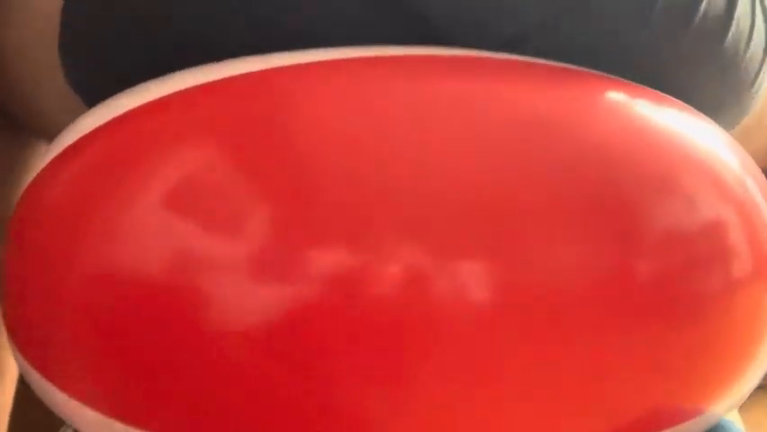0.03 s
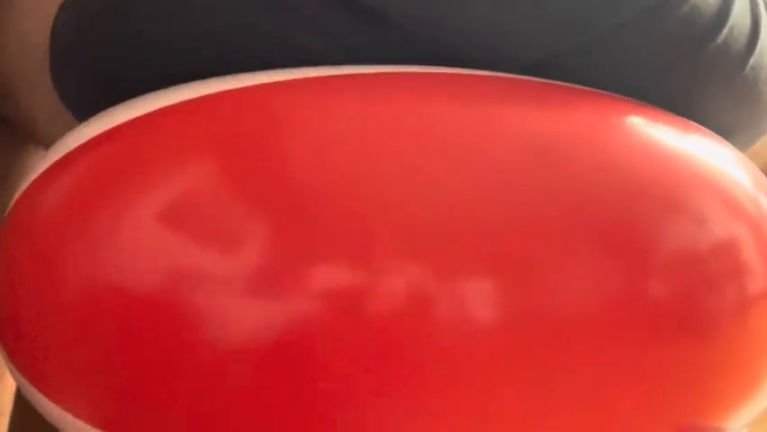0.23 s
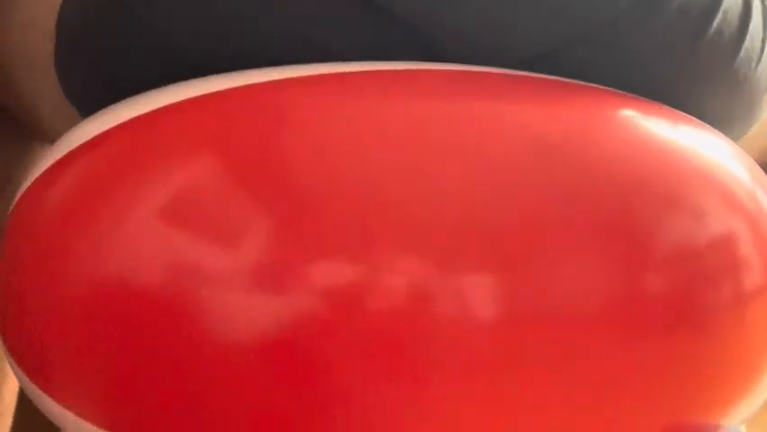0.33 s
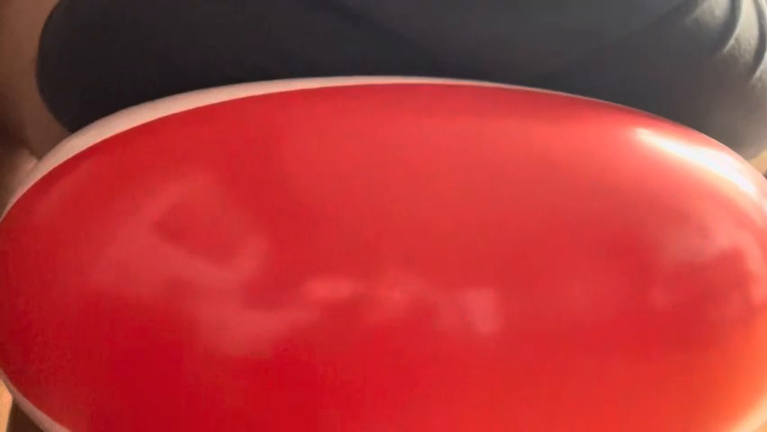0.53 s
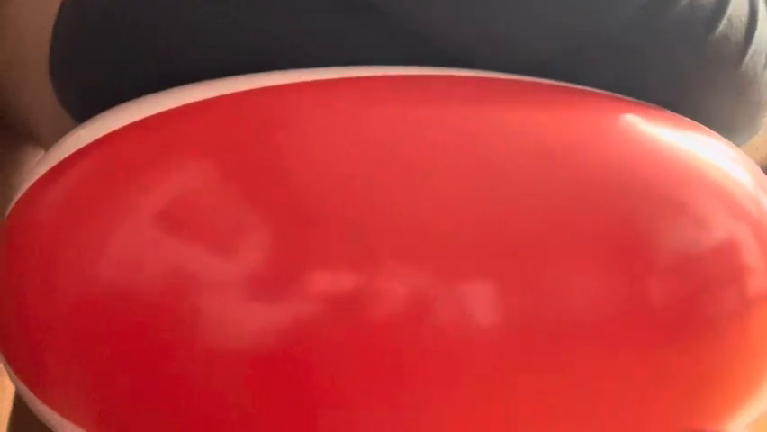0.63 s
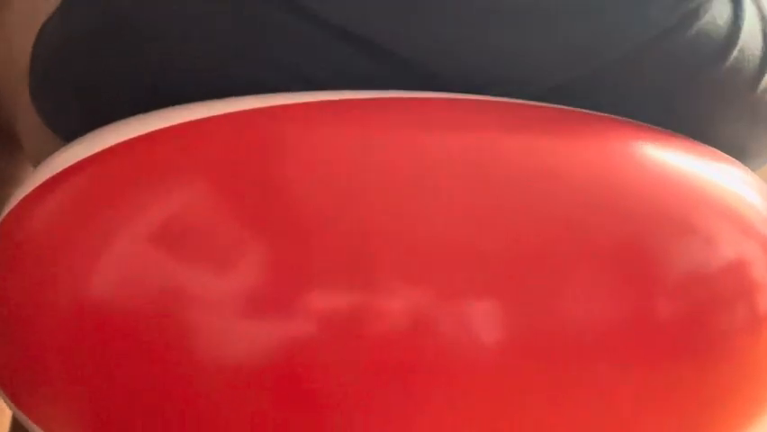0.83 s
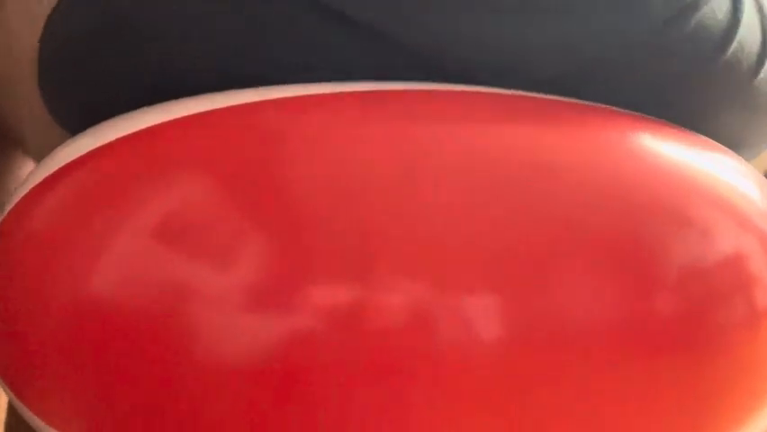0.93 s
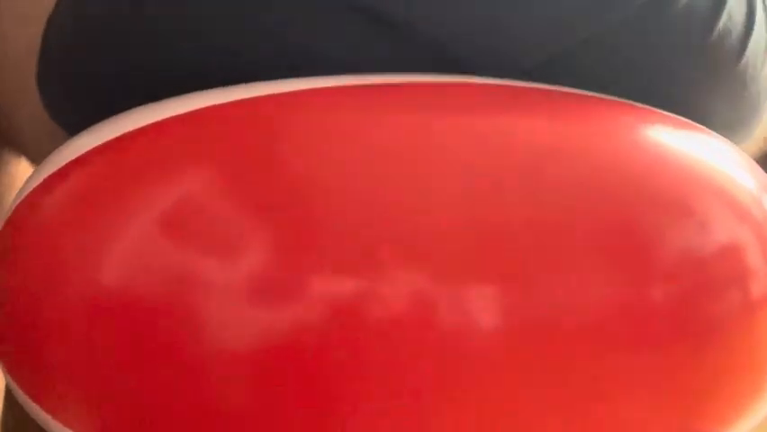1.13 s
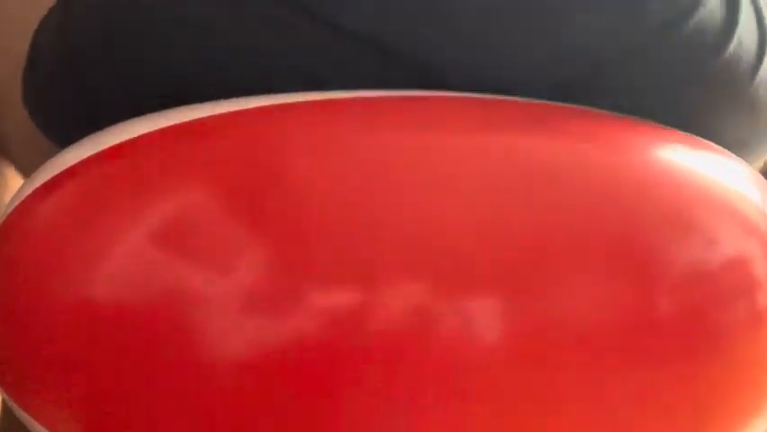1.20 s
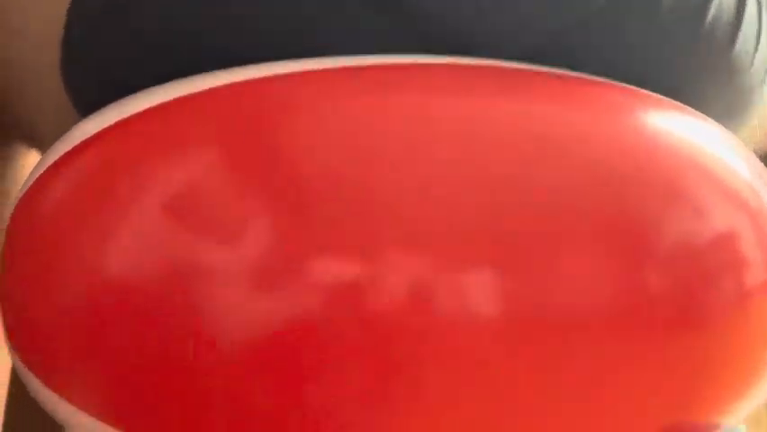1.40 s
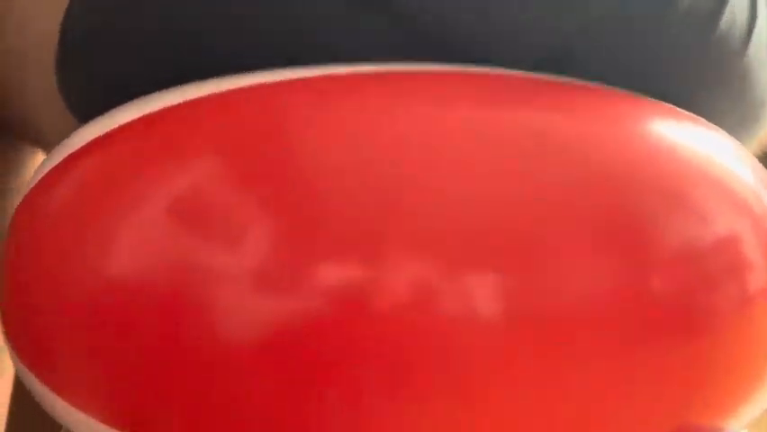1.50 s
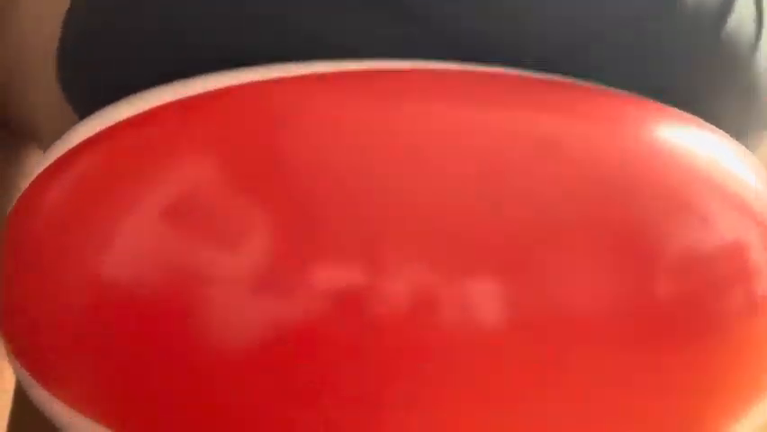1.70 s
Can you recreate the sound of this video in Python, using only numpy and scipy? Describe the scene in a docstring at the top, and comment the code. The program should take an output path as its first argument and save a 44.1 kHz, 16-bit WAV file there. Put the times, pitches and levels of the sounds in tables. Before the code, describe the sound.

A big inflated vinyl ball gives a short stuttering, rubbery creak as someone shifts against it.

```python
"""A faint rustle, two snaps, then a stuttering run of them: a person shifts against a big inflated
vinyl ball, close to a stereo microphone in a small room. The skin sticks and slips. Each slip is a
crack and a falling thump of the skin; the air in the ball rings on. Small ticks, soft rustles of
cloth and low bumps follow as the weight settles, over a low rumble and a faint hiss."""
import sys
import numpy as np
from scipy import signal
from scipy.fft import rfft, irfft, next_fast_len
from scipy.io import wavfile
from scipy.ndimage import map_coordinates

SR = 44100
rng = np.random.default_rng(int(sys.argv[2]) if len(sys.argv) > 2 else 0)


def unload_audio(sound):
    """Save the sound as a 16-bit wav file, at the path given as the first command line argument."""
    columns = np.transpose(np.atleast_2d(sound))
    # keep every value between -1 and 1, then stretch to whole-number steps
    steps = np.round(np.clip(columns, -1, 1) * 32767)
    wavfile.write(sys.argv[1], SR, steps.astype(np.int16))


N = 77175

# How long the air in the ball rings: freq_hz, t60_s
BALL_DECAY = [(500, 0.45), (2400, 0.46), (4000, 0.35), (8000, 0.15), (14000, 0.27)]


def slips():
    """The vinyl sticks and lets go: each slip or tick is a thump and a crack with a rough tail."""
    # Slips of the skin: start_s, thump_db, crack_db, start_pitch_hz
    snaps = [(0.1786, -20.5, -48.5, 822), (0.2086, -15, -36.5, 855), (.4213, -6, -21.5, 742),
             (.4449, -16.5, -44, 773), (.4504, -10, -25.5, 846), (0.4555, -8, -25.5, 859),
             (.4626, -7, -22, 883), (0.4727, -9.5, -21, 910), (0.4848, -9.5, -22, 879),
             (0.5039, -8.5, -21, 851), (.5222, -6, -18, 909), (0.534, -8.5, -19, 884),
             (.543, -8.5, -23, 904), (.5495, -11, -20, 918), (.5546, -10.5, -24.5, 912),
             (.5589, -20.5, -24.5, 970), (.5628, -22, -29, 968), (0.5669, -23, -30, 950),
             (.571, -20.5, -35.5, 860)]
    # Small ticks of the vinyl: start_s, thump_db, crack_db, start_pitch_hz
    ticks = [(.4055, -38, -44, 794), (.7035, -32.5, -33, 930), (.709, -28, -41, 744), (.742, -32, -39, 960),
             (.776, -39, -41.5, 700), (.961, -48, -64, 650), (.979, -35.5, -59, 720),
             (.987, -42, -45.5, 722), (.999, -43.5, -47.5, 904), (1.227, -39.5, -64.5, 714),
             (1.59, -42, -52, 1473)]
    # How well the skin radiates the thump: freq_hz, gain_db
    skin_radiation = [(80, -2), (150, -1), (250, 1.5), (350, 0.5), (500, -3.5), (760, 2.5), (1000, -1.5),
                      (1300, -0.5), (2000, 4)]
    # Bright snap of the vinyl, with a dip at 8.5-11 kHz in the same response: freq_hz, gain_db
    snap_and_notch = [(100, -53), (400, -29.5), (900, 0.5), (1700, 5), (2600, -4.5), (3600, 1.5),
                      (5000, -6.5), (7000, -12), (8500, -35.5), (11000, -34.5), (13500, -24.5),
                      (16000, -34)]
    thump_lag_s, tail_s = 0.00028, 0.0023  # the flexing wave arrives just after the crack
    thumps, cracks = np.zeros(N), np.zeros(N)
    for start_s, thump_db, crack_db, pitch_hz in snaps + ticks:
        t = since(start_s)
        thumps += amp(thump_db - 1) * thump(start_s + thump_lag_s, pitch_hz)
        tail = (t > 0) * np.exp(-t / tail_s) * rng.standard_normal(N)
        cracks += amp(crack_db - 3.5) * np.sqrt(2 / (tail_s * SR)) * tail
        cracks[round(start_s * SR)] -= amp(crack_db)
    upward_sweep = lambda hz: np.exp(2j * np.pi * 1.4 * np.log(hz + 810))  # lows lead the highs
    cracks = amp(17) * filtered(cracks, lambda hz: causal(snap_and_notch)(hz) * upward_sweep(hz))
    return filtered(thumps, causal(skin_radiation)), cracks


def thump(start_s, pitch_hz):
    """A flexing wave in the skin swells while its pitch falls; the whole ball gives after it."""
    t = since(start_s)
    glide_s, end_ratio, body_hz = 0.004, 0.3, 207.6
    cycles = pitch_hz * (end_ratio * t + (1 - end_ratio) * glide_s * (1 - np.exp(-t / glide_s)))
    swell = lambda peak_s, sharpness: (t / peak_s * np.exp(1 - t / peak_s)) ** sharpness
    after_swing = amp(-18.5) * swell(0.0066, 2.95)
    skin = (swell(0.002, 2) + after_swing) * np.sin(2 * np.pi * cycles)
    body = amp(-24.5) * swell(0.0035, 1.38) * np.sin(2 * np.pi * body_hz * t)
    return skin + body


def air_modes(drive):
    """The air in the ball rings at its own pitches after each slip."""
    # Resonances of the enclosed air: pitch_hz, level_db
    modes = [(241, -3), (378, -2), (409, -2), (437, -1), (487, -5), (597, 0), (727, 1), (767, 1), (893, -1),
             (991, 0), (1392, 1), (1719, -2), (2154, -1), (2450, -2)]
    t, t60_s = since(0), 0.55
    ring = sum(amp(db) * np.sin(2 * np.pi * hz * t) for hz, db in modes)
    return signal.fftconvolve(drive, ring * amp(-58 - 60 * t / t60_s))[:N]


def ball():
    """Slips reach the microphone directly, after trips across the ball, and in its ring and the room."""
    # Trips across the ball: delay_s, crack_db, thump_db
    echoes = [(.0039, -6.5, -19.5), (.0078, -14, -9.5)]
    # Shading of the thumps and air modes in the left channel: freq_hz, gain_db
    left_shade = [(100, -3), (220, -2), (380, -6.5), (550, -19.5), (750, -1), (1100, -1), (2400, 3.5)]
    # Dense upper air modes: freq_hz, gain_db
    upper_modes = [(150, -54), (600, -20), (1300, -6), (1800, -3), (2400, 5), (3000, -5), (3600, -14),
                   (7000, -4), (10000, 12), (16000, -14)]
    thumps, cracks = slips()
    low = thumps + sum(amp(db) * delayed(thumps, delay_s) for delay_s, _, db in echoes)
    low += air_modes(cracks + amp(-13) * thumps)
    high = cracks + sum(amp(db) * delayed(cracks, delay_s) for delay_s, db, _ in echoes)
    low_left = filtered(low, causal(left_shade))
    ring = amp(6.5) * reverberate(cracks, upper_modes, BALL_DECAY, build_s=0.0043)
    return np.array([low_left, low]) + high + ring + room(thumps)


def room(thumps):
    """The small room answers the thumps, a little weaker on the left."""
    # Colour of the reverberation: freq_hz, gain_db
    colour = [(100, -24.5), (240, 5), (400, -2), (700, -2.5), (1200, 11.5), (3000, 23)]
    # Reverberation time: freq_hz, t60_s
    decay = [(150, 0.35), (500, 0.47), (2000, 0.36)]
    return amp([[-10.5], [-7]]) * reverberate(thumps, colour, decay, build_s=0.012)


def rustles():
    """Cloth drags over the vinyl in short grainy strokes, and the ball rings faintly."""
    # Strokes of cloth: peak_s, level_db, rise_s, fall_s
    strokes = [(.005, -48, 0.055, 0.053), (0.126, -51.5, 0.089, 0.06), (.27, -54, 0.033, 0.022),
               (0.781, -46.5, 0.15, 0.051), (0.866, -55.5, 0.015, 0.017), (0.994, -47, 0.025, 0.04),
               (1.121, -60.5, 0.059, 0.026), (1.234, -49.5, 0.025, 0.0148), (1.259, -55.5, 0.015, 0.02),
               (1.389, -58, 0.049, 0.064), (1.595, -51, 0.027, 0.016), (1.615, -49.5, 0.047, .03),
               (1.74, -55, 0.044, 0.029)]
    # Colour of the cloth: freq_hz, gain_db
    colour = [(100, -38.5), (200, -1), (320, -9.5), (500, -3.5), (900, -10), (1800, -16), (2400, -20),
              (3000, -26.5), (6600, -30.5), (8500, -34), (11000, -38), (16000, -43.5)]
    # What the cloth sets ringing in the ball: freq_hz, gain_db
    ring_colour = [(200, -12), (1500, -9.5), (2500, 3), (3200, -37), (9000, -17)]
    t = since(0)
    power = sum(amp(db) ** 2 * np.exp(-2 * np.maximum((peak_s - t) / rise_s, (t - peak_s) / fall_s))
                for peak_s, db, rise_s, fall_s in strokes)
    grains = noise(colour) * amp(3 * wobble(knots_per_s=410))
    cloth = np.sqrt(power) * unit(grains)
    ring = reverberate(cloth[1], ring_colour, BALL_DECAY, build_s=0.01)
    return cloth * amp([[-1], [1]]) + ring


def bumps():
    """The ball gives softly under the shifting weight."""
    # Soft bumps of the ball: start_s, level_db, pitch_hz, t60_s
    nudges = [(0.104, -42.5, 135, 0.22), (0.128, -37, 67.6, .1), (0.779, -30, 234, 0.037),
              (0.849, -41.5, 160, 0.15), (1.005, -36.5, 62.6, 0.14), (1.225, -32, 154, 0.055),
              (1.24, -44.5, 55, 0.075), (1.583, -40, 175, 0.15), (1.625, -31, 148, 0.046)]
    rise_s = 0.0059
    sound = np.zeros(N)
    for start_s, level_db, pitch_hz, t60_s in nudges:
        t = since(start_s)
        envelope = amp(level_db - 60 * t / t60_s) * (1 - np.exp(-t / rise_s))
        sound += envelope * np.sin(2 * np.pi * pitch_hz * t)
    return sound


def background():
    """A low rumble that swells and sinks, and a faint hiss."""
    # Course of the rumble: time_s, level_db
    rumble_course = [(0.0, -60), (0.164, -57), (0.184, -57.5), (0.75, -53.5), (0.818, -58.5),
                     (0.848, -52.5), (0.964, -62.5), (1.012, -53), (1.082, -66.5), (1.168, -58),
                     (1.194, -63), (1.252, -52.5), (1.31, -67), (1.364, -54), (1.472, -58.5), (1.75, -54)]
    # Colour of the rumble: freq_hz, gain_db
    rumble_colour = [(20, -44), (33, -15), (47, 4), (70, -5), (110, -5), (180, -11), (300, -16),
                     (600, -40.5)]
    # Colour of the hiss: freq_hz, gain_db
    hiss_colour = [(120, -25), (250, -3.5), (700, -8), (1300, -18.5), (2400, -12.5), (3100, -19),
                   (6500, -24), (9000, -36), (12500, -26), (16000, -30.5)]
    course_db = np.interp(since(0), *np.transpose(rumble_course))
    sway_db = 1.5 * wobble(knots_per_s=4.8)
    rumble = amp(course_db + sway_db + 1.5) * unit(noise(rumble_colour))
    return rumble + amp(-68) * unit(noise(hiss_colour))


def noise(colour):
    """Coloured stereo noise, mostly alike in both channels, with a thin side-only band near 9 kHz."""
    # Split between mid and side: freq_hz, balance (1 is mid only, -1 or less is side only)
    mid_side_balance = [(60, 1), (130, .95), (290, 0.84), (640, -0.21), (1400, 0.5), (3100, 0.9),
                        (6800, 0.41), (9000, -3.2), (13000, 1)]

    def mid_side_gains(hz):
        angle = np.arccos(np.clip(along(mid_side_balance, hz), -1, 1)) / 2
        return amp(along(colour, hz)) * [np.cos(angle), np.sin(angle)]
    mid, side = filtered(rng.standard_normal((2, N)), mid_side_gains)
    return np.array([mid + side, mid - side])


def reverberate(x, colour, decay, build_s):
    """x through a diffuse stereo tail in which each frequency dies at its own speed."""
    hz, t, spectra = signal.stft(noise(colour), SR, nperseg=256)
    t60_s = along(decay, hz)[:, None]
    equal_energy = np.sqrt(2 * np.log(1000) / (t60_s * SR))
    tail = signal.istft(spectra * amp(-60 * t / t60_s) * equal_energy, SR, nperseg=256)[1][:, :N]
    build_up = 1 - np.exp(-since(0) / build_s)
    return signal.fftconvolve(x[None], tail * build_up, axes=1)[:, :N]


def amp(db):
    """Decibels to gain."""
    return 10 ** (np.asarray(db) / 20)


def unit(x):
    """x scaled to rms 1."""
    return x / np.sqrt(np.mean(x ** 2) + 1e-20)


def since(start_s):
    """Seconds since start_s, zero before it."""
    return np.maximum(np.arange(N) / SR - start_s, 0)


def along(points, hz):
    """(freq_hz, value) points interpolated on a log frequency axis."""
    freqs, values = np.transpose(points)
    return np.interp(np.log(hz + 1), np.log(freqs + 1), values)


def wobble(knots_per_s):
    """A smooth random curve."""
    knots = rng.standard_normal(int(N * knots_per_s / SR) + 4)
    return map_coordinates(knots, [np.arange(N) * knots_per_s / SR])


def filtered(x, response):
    """x through a complex response of frequency."""
    size = next_fast_len(N + SR // 2)
    return irfft(rfft(x, size) * response(np.fft.rfftfreq(size, 1 / SR)), size)[..., :N]


def delayed(x, delay_s):
    """x, delay_s later."""
    return filtered(x, lambda hz: np.exp(-2j * np.pi * hz * delay_s))


def causal(points):
    """The minimum-phase response through (freq_hz, gain_db) points."""
    def response(hz):
        cepstrum = irfft(np.log(amp(along(points, hz))))
        half = len(cepstrum) // 2
        return np.exp(rfft(np.r_[cepstrum[0], 2 * cepstrum[1:half]], len(cepstrum)))
    return response


def scene():
    """The ball close up and the room behind it, left and right."""
    return ball() + rustles() + bumps() + background()


def record(dry):
    """Nothing is kept above the band limit."""
    top_hz = 16200
    return filtered(dry, lambda hz: hz < top_hz)


dry = scene()
out = record(dry)
unload_audio(out)
```